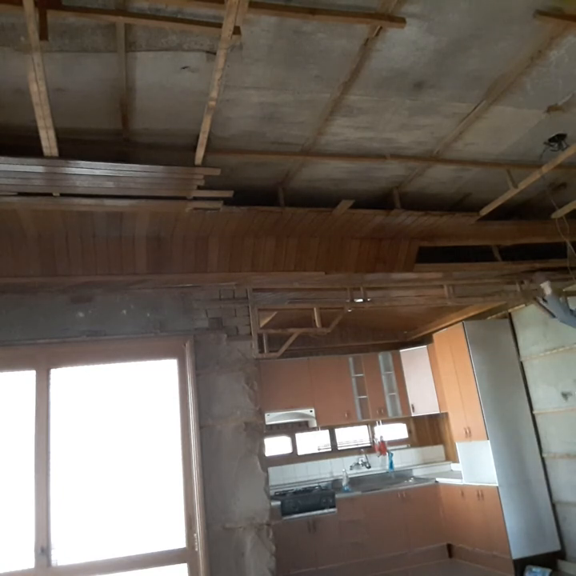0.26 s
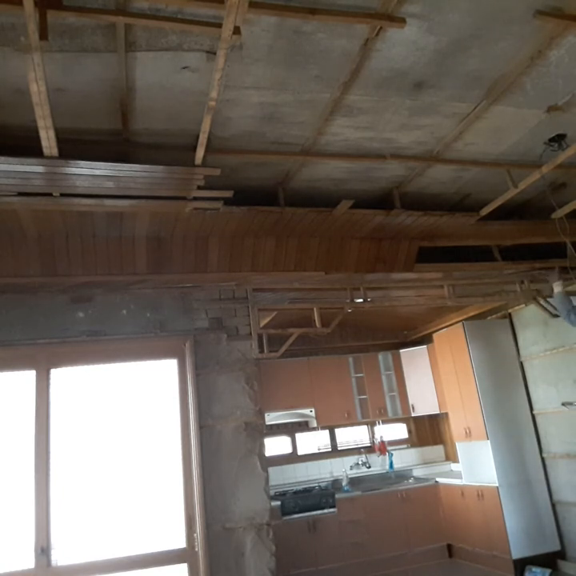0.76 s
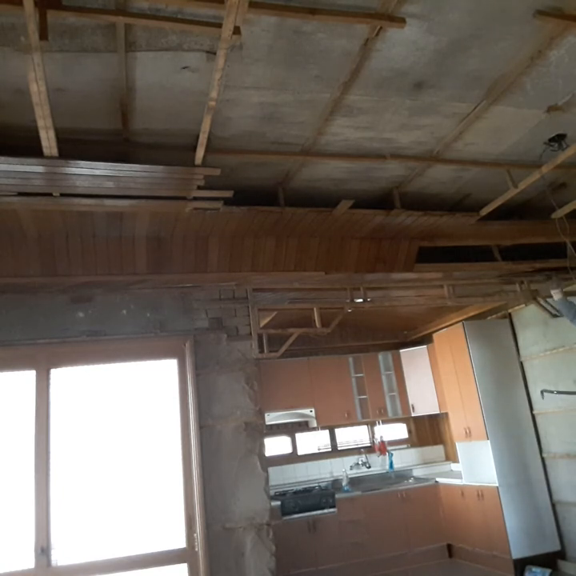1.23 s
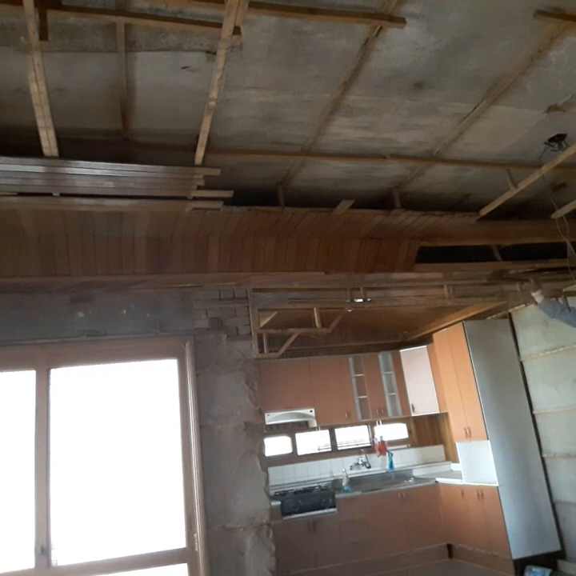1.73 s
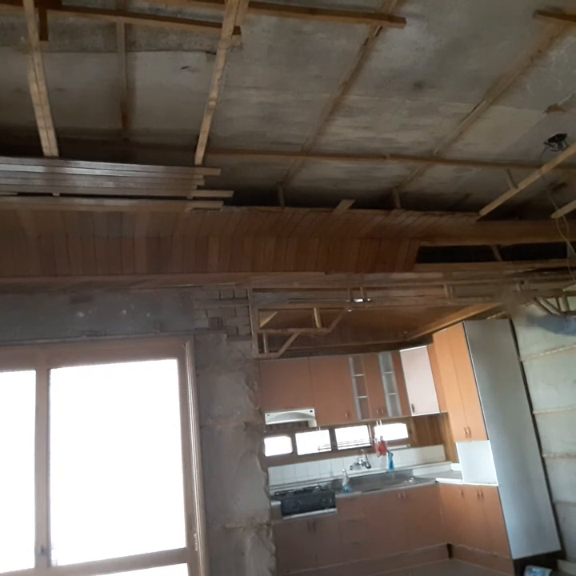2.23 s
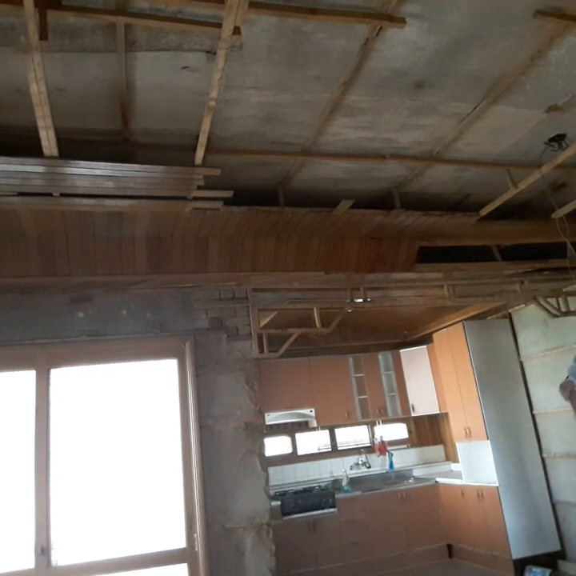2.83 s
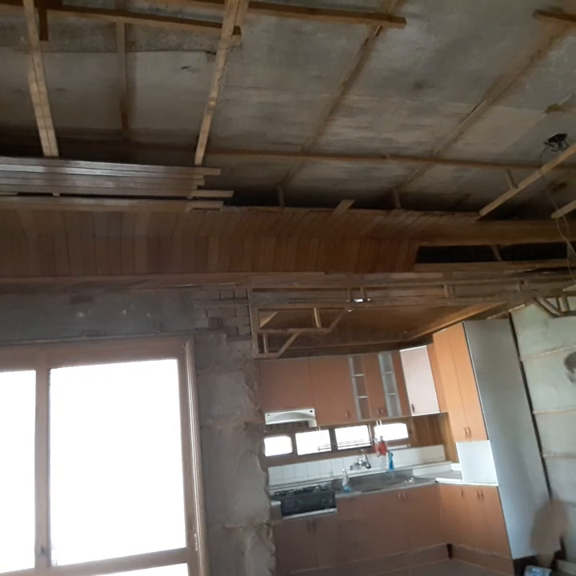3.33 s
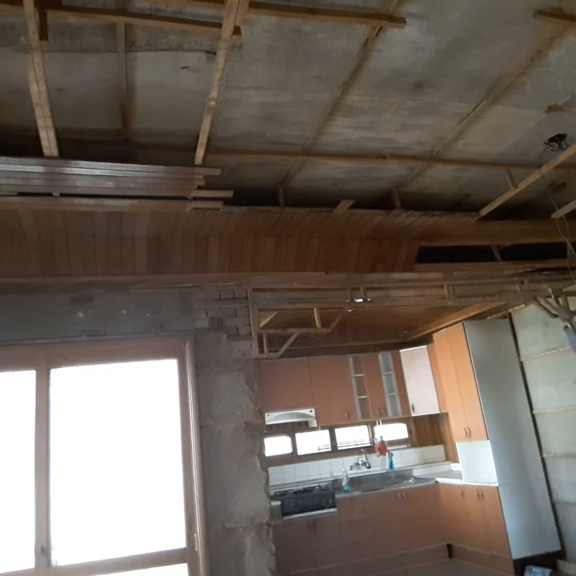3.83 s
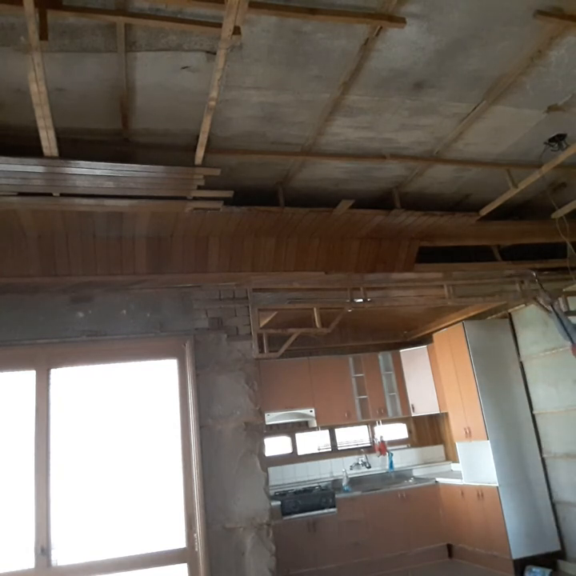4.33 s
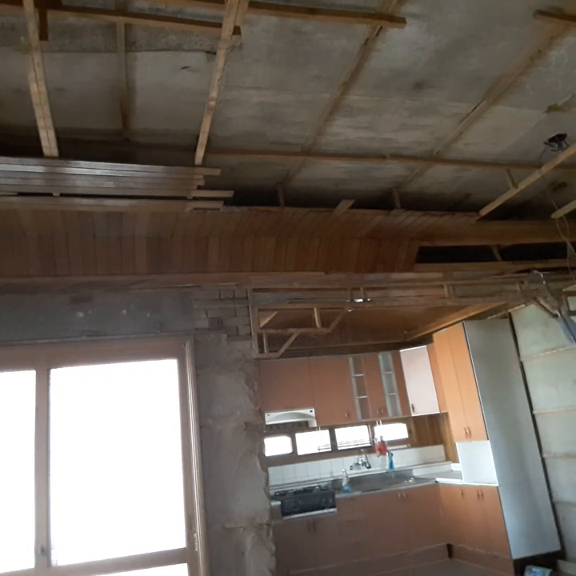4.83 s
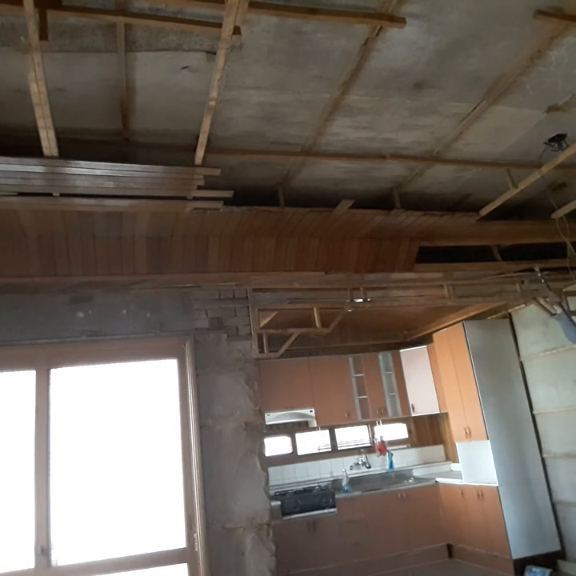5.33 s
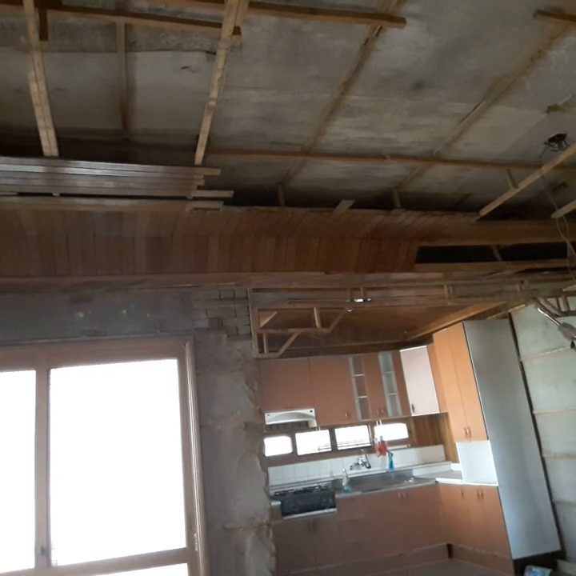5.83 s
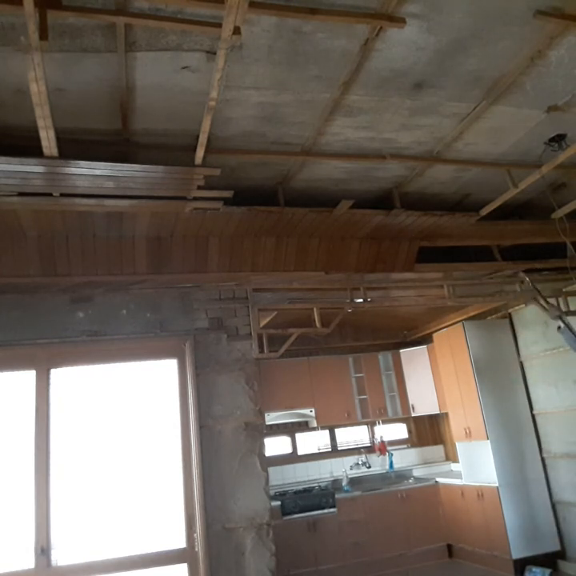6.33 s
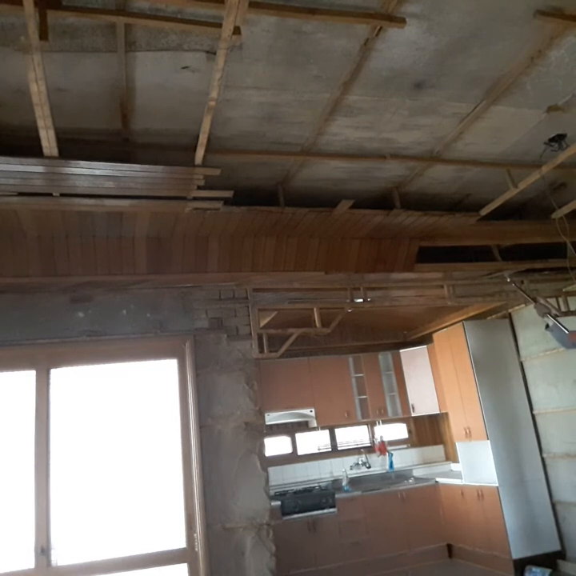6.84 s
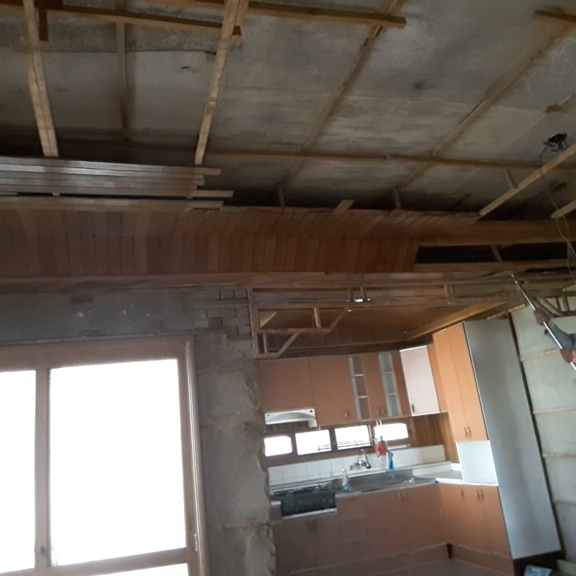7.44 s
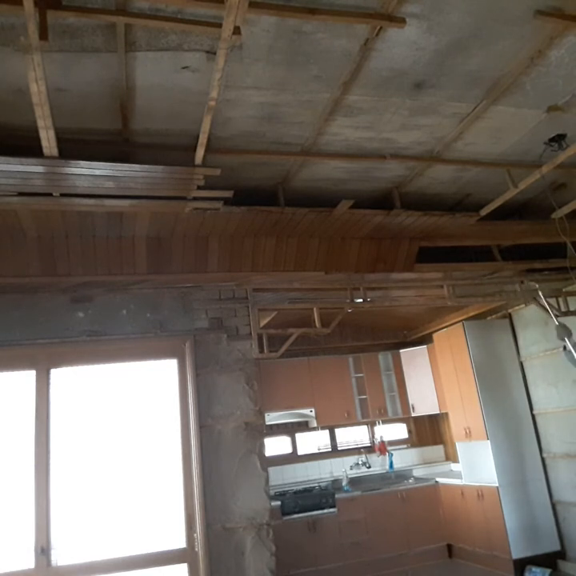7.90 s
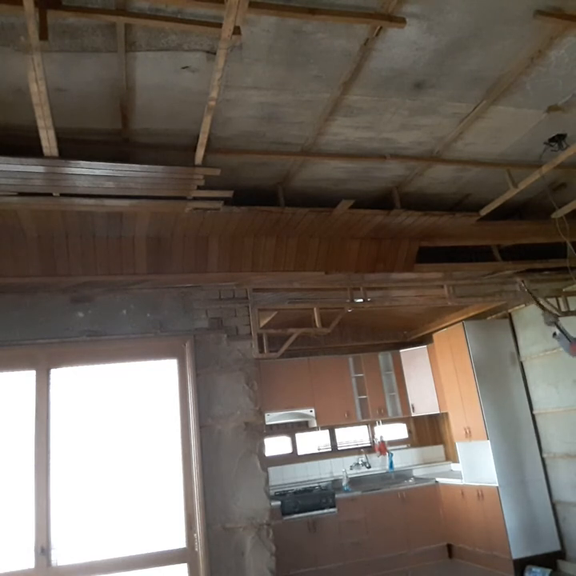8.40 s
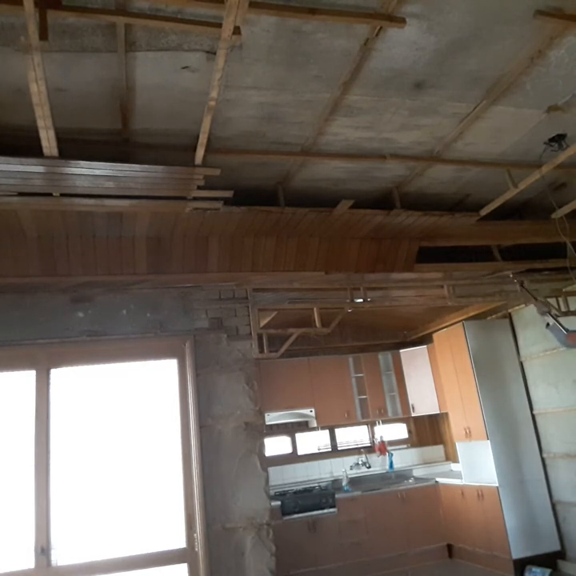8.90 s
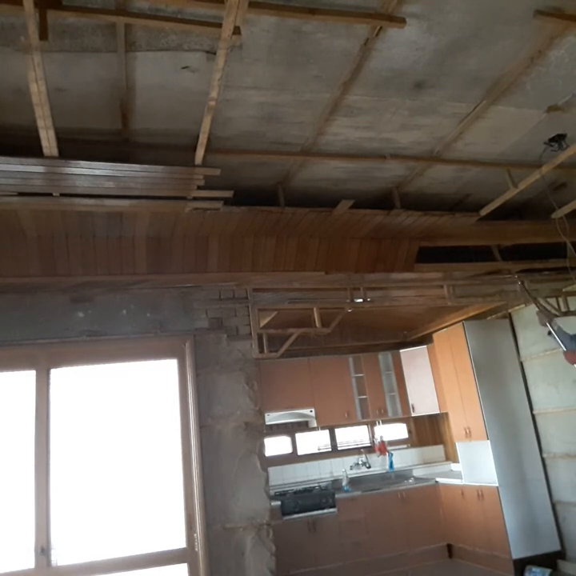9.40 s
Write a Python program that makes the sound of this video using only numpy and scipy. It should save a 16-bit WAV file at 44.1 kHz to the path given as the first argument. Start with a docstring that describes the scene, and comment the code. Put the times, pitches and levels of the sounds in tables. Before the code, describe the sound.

A boarded ceiling is torn down with a crowbar in a bare, ringing room, heard through a phone, a little stronger on the left. For the first 1.5 s there are only faint ticks, dull thuds, a nail creak and light scrapes. At 1.5 s a board peels, fibres tearing ever harder into a bright crack at 1.65; two sharp, splintery snaps follow at 2.2. A fuller cluster with a thud hits at 3.5, another burst at 4.4, then quiet knocks, a creak and tiny clinks around 5. A very loud bang lands at 5.6. Small creaks, thuds and scrapes fill 6 to 7, with moderate cracks at 7.1-7.2. Heavy breaks strike at 7.7 and 7.9, the latter among the loudest. After weak cracks near 8.5, a rattling run from 8.9 ends around 9.4. Hard walls echo for over half a second with low boom, above faint rumble and hiss.

```python
"""A boarded ceiling is torn down with a crowbar in a bare, ringing room, heard through a phone.
Faint cracks, thuds and scrapes come first; at 1.5 s a board peels off, its fibres tearing ever harder.
From 2.2 s loud breaks come in bursts, runs of snapping fibres that ring the boards, some after a small warning.
Nails creak by slipping, scrapes are fine grains, the bar clinks; the loudest breaks are at 5.6 and 7.9 s.
A last rattle of breaks ends near 9.4 s. Hard walls add dense echoes and a low boom; faint rumble and hiss stay."""
import sys
import numpy as np
from scipy import signal
from scipy.fft import rfft, irfft
from scipy.io import wavfile
from scipy.ndimage import uniform_filter1d

SR = 44100
rng = np.random.default_rng(int(sys.argv[2]) if len(sys.argv) > 2 else 0)


def master(y):
    """Save y as 16-bit WAV."""
    cut = np.clip(np.atleast_2d(y).T, -1, 1)
    pcm = np.round(cut * 32767)  # scale
    wavfile.write(sys.argv[1], SR, pcm.astype(np.int16))


N = 426006

# All event levels are relative: the room and the two ports change them later.
# Wood struck or breaking: (time [s], level [dB], heft as low knock [dB], splinter treble [dB],
# fading time of the break [s])
CRACKS = [ (0.001, -38, 6.5, -1.5, 0.005), (0.387, -43, 4, -1.5, 0.037), (1.472, -44, -1.5, -1.5, 0.014),
          (1.649, -19.5, -6.5, 8, 0.015), (2.168, -13.5, -14, 1.5, 0.0066), (2.205, -9, -12, 4, 0.031),
          (2.791, -39.5, -17, 0.5, 0.046), (3.496, -25, 4.5, 5, 0.0087), (3.513, -18.5, 5, 1.5, 0.0083),
          (3.557, -13.5, 3.5, 0.5, 0.035), (4.402, -19.5, 0, 4.5, 0.015), (4.409, -11, -2.5, 1.5, 0.042),
          (4.49, -20.5, -2, 5.5, 0.033), (5.108, -40.5, 7.5, -8, 0.024), (5.449, -24.5, -10, -3, .029),
          (5.56, -6, -4, -6.5, 0.027), (5.85, -52.5, 15, 4, 0.048), (6.158, -52.5, 11.5, 8, 0.0089),
          (6.428, -35.5, -4, -1, 0.033), (6.82, -46, 9, -1.5, 0.021), (7.052, -29.5, -4, 4.5, 0.02),
          (7.226, -25, -11, 4, 0.0062), (7.495, -46.5, 11, -19, .028), (7.741, -9, 0, 1.5, 0.023),
          (7.882, -6, -3, -3.5, 0.035), (8.526, -33, -8.5, -7, 0.026), (8.56, -38, 0.5, -3, 0.035),
          (8.806, -35, -23, -10, 0.0054), (8.914, -20, -12, -4.5, .024), (9.122, -16, -1.5, -4, 0.064),
          (9.163, -16.5, 2, 1.5, 0.024), (9.235, -18, 0.5, 2.5, 0.022), (9.375, -23, 10, -4.5, 0.025)]
# A few fibres give just before the wood breaks: (time [s], level [dB])
WARNINGS = [(2.132, -33), (4.362, -38.5), (5.54, -26), (7.175, -38.5), (7.673, -43)]
# Dull blows on battens and floor: (time [s], level [dB], pitch [Hz])
THUDS = [ (0.445, -40, 139), (0.53, -47.5, 283), (0.8, -54, 129), (1.1, -50.5, 190), (2.24, -29.5, 181),
         (3.495, -19.5, 259), (4.785, -36, 417), (4.803, -29, 326), (5.158, -40, 265), (6.462, -33, 142),
         (6.48, -38.5, 303), (6.825, -31.5, 226), (6.875, -44, 390), (7.516, -41, 212), (7.585, -44.5, 260),
         (7.762, -21.5, 138), (8.585, -43.5, 250), (9.17, -27.5, 144), (9.39, -27.5, 142)]
# A board peels off its nails: (time [s], level [dB], length [s])
PEELS = [(1.52, -25.5, .135)]
# Nails dragging in wood: (time [s], level [dB], pitch [Hz], length [s], ring width before squaring [Hz])
CREAKS = [(0.001, -45.5, 570, .02, 90), (1.1, -39.5, 970, .016, 451), (2.0, -51.5, 513, .13, 200),
          (5.031, -43.5, 1066, .035, 262), (6.434, -30, 1360, .025, 558), (9.38, -29, 2770, 0.027, 260)]
# Bar and boards sliding: (time [s], level [dB], length of the swell [s])
SCRAPES = [(0.601, -51.5, 0.6), (0.869, -45, .32), (1.122, -50.5, 0.39), (1.88, -44.5, 0.27),
           (4.9, -56.5, .16), (6.001, -50.5, 0.087), (6.559, -49, 0.18), (7.382, -42, 1),
           (8.62, -45.5, 0.23)]
# The bar catches on a nail and chips the wood: (time [s], level [dB])
CLINKS = [(2.096, -47.5), (5.174, -53), (5.307, -49.5), (6.872, -53), (7.02, -55.5)]
# The chip of wood at each clink: (level over the clink [dB], heft [dB], splinter treble [dB])
CHIP = (-2.5, -6, 13)
# A crumb of wood or plaster knocked loose by a scrape: (heft [dB], splinter treble [dB], fading time [s])
CRUMB = (-2.5, 9, .012)
# Ringing of the steel bar: (frequency [Hz], level [dB], time to fade by 60 dB [s])
STEEL_RINGS = [(2200, 2.5, 0.031), (2770, -1.5, .07), (4820, -2, 0.022), (6060, -1, 0.013),
               (8900, -2.5, .01), (12200, -6, .01)]
# What a struck board rings with: (frequency [Hz], width [Hz], level over the rest [dB])
BOARD_RINGS = [(343, 88, 2.5), (510, 10, 2), (490, 22, -1.5), (750, 190, -3.5), (920, 18, -1),
               (1660, 300, 1), (2204, 74, 3), (2450, 19, 2), (2820, 51, -1.5), (3950, 33, 4.5)]
# Broad spectrum of breaking wood: (frequency [Hz], relative level per Hz [dB])
WOOD_SPECTRUM = [(30, -35), (70, -19), (105, -16.5), (132, -2.5), (330, -3.5), (800, -0.5), (1450, -3.5),
                 (2400, -3), (3500, -8), (5500, -14), (8000, -14.5), (9400, -23), (11800, -19.5),
                 (16000, -26.5)]
# How long the wall echoes last: (frequency [Hz], time to fade by 60 dB [s])
ECHO_FADES = [(60, 2.3), (140, 0.69), (300, 0.75), (700, 0.73), (2200, 0.67), (4500, 0.58), (8000, 0.42),
              (15000, 0.27)]
# Low booming of the room: (frequency [Hz], level [dB], time to fade by 60 dB [s])
ROOM_BOOMS = [(90, -26.5, 1), (130.9, -21, 0.98), (139.6, -19.5, 0.32), (151.8, -27, 1),
              (182.4, -45.5, 0.27), (242.8, -25.5, .8)]
# How much louder the left port is than the right: (frequency [Hz], level difference [dB])
LEFT_OVER_RIGHT = [(130, 2.46), (4000, 0.96), (8500, 1), (10000, 3), (15000, 4)]
# Spectrum of the empty house: (frequency [Hz], relative level per Hz [dB])
QUIET_SPECTRUM = [(25, -8.5), (60, 4.5), (130, -6), (300, -7.5), (1000, -13.5), (2000, -12.5), (4000, -22),
                  (9000, -29), (14500, -21.5), (16000, -26)]

BOOM_DB = -5  # deepest bass of a break; light pieces have less still
KNOCK_SHARE = 0.95  # share of the heft that also shows in the hollow midrange
WARNING_HEFT_DB, WARNING_SPLINTER_DB, WARNING_S = -2.5, 3, .006
CHIP_S = .004  # fading time of a chip
CRUMB_DB, CRUMB_SPREAD_DB = -63.5, 3
THUD_CYCLES = 2.8  # a blow's rattle fades over this many cycles: low timber settles slowest
PEEL_RISE_DB_PER_S = 149.5
PORT_GAP_M = 0.15  # distance between the two ports the sound enters by
DIRECT_DB = 25.5  # level of the direct sound in the room's response
QUIET_DB = -63
TOP_HZ = 15900  # no treble passes the phone above here
PLACES = 5  # places on the ceiling, each with its own echoes
ROOM_SIZE = 49152  # samples of echo
SIZE = 16384  # samples of one short sound, 0.37 s
T = np.arange(SIZE) / SR
HZ = np.arange(SIZE // 2 + 1) * SR / SIZE + 1e-3  # just above zero, so that dividing is safe


def cracks(top_slope=1.4):
    """Hefty pieces flex the whole board and knock low; thin splinters, chips and crumbs are bright."""
    body = wood()

    def crack(heft_db, splinter_db, length):
        """One break, coloured by how the board gives way."""
        bass = [(130, BOOM_DB + min(heft_db, 0)), (280, heft_db), (800, KNOCK_SHARE * heft_db)]
        treble = [(2400, 0.028), (8000, splinter_db), (15000, top_slope * splinter_db)]
        tilt_db = along(bass + treble, HZ)
        return colour(snaps(length), body * own_modes() * undb(tilt_db))

    warnings = [(s, db, WARNING_HEFT_DB, WARNING_SPLINTER_DB, WARNING_S) for s, db in WARNINGS]
    chips = [(s, db + CHIP[0], *CHIP[1:], CHIP_S) for s, db in CLINKS]
    return play(CRACKS + warnings + chips + crumbs(), crack)


def snaps(length, rate=5000, spread_db=3.5, first=0.29, give=.08):
    """A first snap, then a run of fibres giving way that grows and dies, a few much larger than the rest."""
    spread = undb(spread_db * np.minimum(rng.exponential(size=SIZE), 4))
    sizes = rng.standard_normal(SIZE) * spread
    happens = rng.random(SIZE) < rate / SR  # rate is in snaps per second
    age = T / max(length, .001)
    growth_and_fade = np.exp(-age) * (1 - np.exp(-age / give))
    run = unit(sizes * happens * growth_and_fade)
    run[0] += first
    return scatter(unit(run))


def wood():
    """Gain of the boards: a broad spectrum with their own rings on top, mean power 1."""
    rings_db = sum(db * resonance(hz, width) ** 2 for hz, width, db in BOARD_RINGS)
    gain = undb(along(WOOD_SPECTRUM, HZ) + rings_db)
    return gain / np.sqrt(np.mean(gain ** 2))


def own_modes(depth_db=1.67, width_hz=110):
    """No two pieces of timber are alike: random resonances and gaps, mean power 1."""
    span = max(int(width_hz * SIZE / SR), 2)
    ripple = uniform_filter1d(uniform_filter1d(rng.standard_normal(len(HZ)), span), span)
    less_in_bass = np.minimum(HZ / 500, 1)
    gain = undb(depth_db * ripple / np.std(ripple) * less_in_bass)
    return gain / np.sqrt(np.mean(gain ** 2))


def crumbs():
    """Each scrape knocks one crumb loose, at a random moment and strength."""
    chance = rng.random((len(SCRAPES), 2))
    return [(s + when * length, CRUMB_DB + CRUMB_SPREAD_DB * (2 * size - 1), *CRUMB)
            for (s, _, length), (when, size) in zip(SCRAPES, chance)]


def thud(pitch, width=1.0, lowest_hz=105):
    """A soft, rattling contact moves only the low bending modes; narrow timber radiates no deep bass."""
    radiation = 1 / np.sqrt(1 + (lowest_hz / HZ) ** 6)
    bending = resonance(pitch, width * pitch) ** 2
    rattle = snaps(THUD_CYCLES / pitch, rate=2500, first=0.16)
    return unit(colour(rattle, radiation * bending))


def peel(length, fibre_rate=3000, bass_db=-4, splinter_db=8):
    """Fibres tear ever harder as the board is levered away, until it lets go."""
    fibres = rng.standard_normal(SIZE) * (rng.random(SIZE) < fibre_rate / SR)
    strain = undb(PEEL_RISE_DB_PER_S * np.minimum(T - length, 0)) * (T < length)
    tilt_db = along([(800, bass_db), (2400, 0.0065), (8000, splinter_db)], HZ)
    return colour(scatter(unit(fibres * strain)), wood() * undb(tilt_db))


def creak(pitch, length, width, slip_hz=260, jitter=0.41):
    """A nail sticks and slips unevenly, each slip ringing the batten."""
    gaps = np.exp(jitter * rng.standard_normal(64)) / slip_hz
    times = np.cumsum(gaps) - gaps[0]
    times = times[times < min(length, T[-1])]
    strengths = rng.uniform(0.32, 1, len(gaps))[:len(times)]
    slips = np.zeros(SIZE)
    slips[(times * SR).astype(int)] = strengths
    return unit(colour(scatter(slips), resonance(pitch, width) ** 2))


def scrapes(rub_hz=1300, rub_width_hz=3500):
    """Sliding over rough timber makes fine grains that swell and fade, cut off at 0.37 s if longer."""
    body = wood() * resonance(rub_hz, rub_width_hz) ** .5

    def scrape(length, grain_rate=900):
        """One stroke."""
        swell = np.sin(np.pi * np.minimum(T / length, 1))
        grains = rng.standard_normal(SIZE) * (rng.random(SIZE) < grain_rate / SR)
        return unit(colour(scatter(grains * swell), body))

    return play(SCRAPES, scrape)


def clink(chatter=0.008):
    """Steel chatters briefly on steel; the hand damps the bar."""
    bar = ring(STEEL_RINGS, T)
    return unit(irfft(rfft(snaps(chatter)) * rfft(bar)))


def room(work):
    """Every place on the ceiling has its own pattern of echoes."""
    return sum(signal.oaconvolve(place[None], echoes(), axes=1)[:, :N] for place in work)


def echoes(build_up=0.00052):
    """Direct sound reaches the left port first; wall echoes thicken, then mostly lose their treble soonest."""
    t = np.arange(ROOM_SIZE) / SR
    hz, field = diffuse(ROOM_SIZE)
    centres = np.log([f for f, _ in ECHO_FADES])
    echo = 0
    # overlapping bands, each fading at its own speed
    for (_, t60), own in zip(ECHO_FADES, np.eye(len(centres))):
        band = irfft(field * np.interp(np.log(hz), centres, own))
        echo = echo + band * np.exp(-np.log(1000) * t / t60)
    echo = echo * (1 - np.exp(-t / build_up)) + ring(ROOM_BOOMS, t)
    lag = rng.integers(3, 10)  # samples by which the right port hears later
    echo[[0, 1], [0, lag]] += undb(DIRECT_DB)
    return echo


def diffuse(size):
    """Spectra of noise from all sides at two ports: alike in the bass, unrelated in the treble."""
    hz = np.arange(size // 2 + 1) * SR / size + 1e-3
    alike = np.sinc(2 * hz * PORT_GAP_M / 343)  # 343 m/s is the speed of sound
    mid, side = rfft(rng.standard_normal((2, size)))
    shared = mid * np.sqrt(1 + alike)
    opposed = np.array([[1], [-1]]) * side * np.sqrt(1 - alike)
    return hz, (shared + opposed) / np.sqrt(2)


def ports(sound):
    """The left port hears the work a little louder, most of all in the top treble."""
    lean_db = along(LEFT_OVER_RIGHT, np.arange(1, N // 2 + 2) * SR / N)
    return irfft(rfft(sound) * undb(np.array([lean_db, -lean_db]) / 2), N)


def quiet():
    """Faint rumble and hiss of the empty house, as steady shaped noise."""
    hz, field = diffuse(N)
    air = irfft(field * undb(along(QUIET_SPECTRUM, hz)), N)
    return air / np.std(air) * undb(QUIET_DB)


def undb(db):
    """Decibels to gain."""
    return 10 ** (np.asarray(db) / 20)


def along(points, hz):
    """Read (Hz, value) points on a log-frequency axis."""
    f, value = np.transpose(points)
    return np.interp(np.log(hz), np.log(f), value)


def unit(x):
    """Scale to unit energy."""
    return x / np.sqrt(np.sum(x ** 2) + 1e-18)


def colour(x, gain):
    """Filter a short sound by a gain at each frequency, causally, so that attacks stay sharp."""
    cepstrum = irfft(np.log(gain + 1e-6))
    # folding the second half onto the first gives the filter its quickest response
    cepstrum[1:SIZE // 2] *= 2
    cepstrum[SIZE // 2 + 1:] = 0
    return irfft(rfft(x) * np.exp(rfft(cepstrum)))


def resonance(hz, width):
    """Gain of one resonance, 1 at its centre."""
    return 1 / np.sqrt(1 + ((HZ ** 2 - hz ** 2) / (HZ * width)) ** 2)


def ring(modes, t):
    """Sum of sines, each fading by 60 dB in its own time."""
    return sum(undb(db - 60 * t / t60) * np.sin(2 * np.pi * hz * t) for hz, db, t60 in modes)


def scatter(clicks):
    """Hand each click to one of several places along the board."""
    return clicks * (rng.integers(PLACES, size=SIZE) == np.arange(PLACES)[:, None])


def play(table, source):
    """Put one sound at the time and level of each row; the other columns go to the source."""
    out = np.zeros((PLACES, N + SIZE))
    for s, db, *rest in table:
        start = max(int(s * SR), 0)
        out[:, start:start + SIZE] += undb(db) * source(*rest)
    return out[:, :N]


def scene():
    """All the work rings in the same room, over the hush of the empty house."""
    work = cracks() + play(THUDS, thud) + play(PEELS, peel)
    work = work + play(CREAKS, creak) + scrapes() + play(CLINKS, clink)
    return ports(room(work)) + quiet()


def record(dry, low_cut_hz=70):
    """The phone thins the deep bass, rounds the loudest peaks and cuts the top."""
    thinned = signal.sosfilt(signal.butter(2, low_cut_hz, "high", fs=SR, output="sos"), dry)
    rounded = thinned / (1 + (thinned / .85) ** 4) ** .25  # peaks stay below .85
    return signal.sosfilt(signal.ellip(10, .2, 80, TOP_HZ, fs=SR, output="sos"), rounded)


dry = scene()
out = record(dry)
master(out)
```